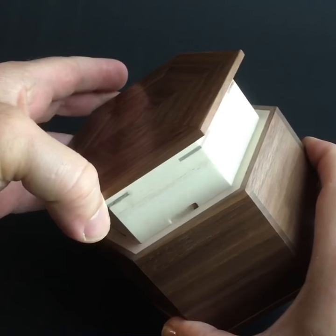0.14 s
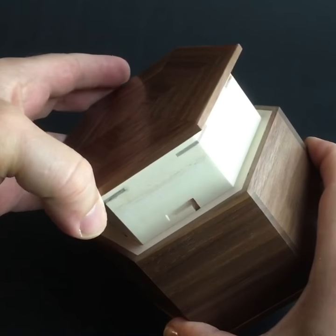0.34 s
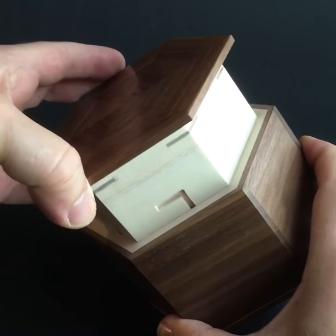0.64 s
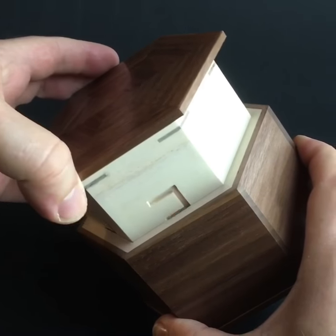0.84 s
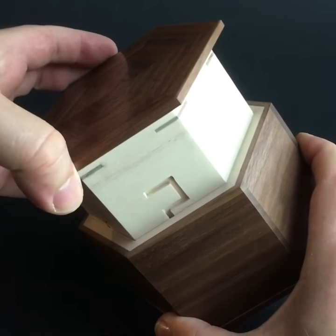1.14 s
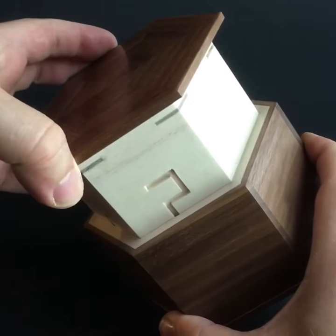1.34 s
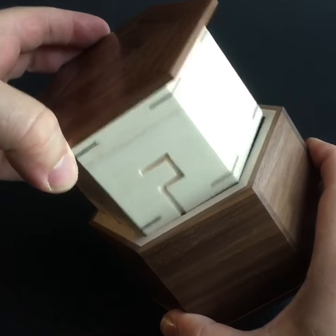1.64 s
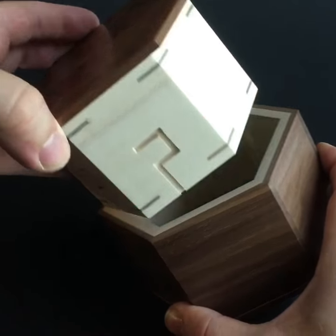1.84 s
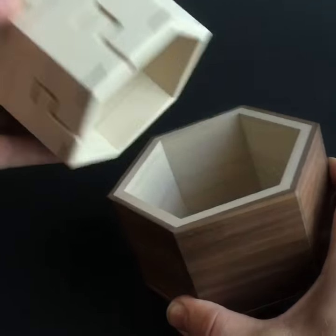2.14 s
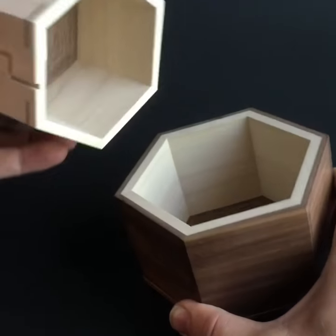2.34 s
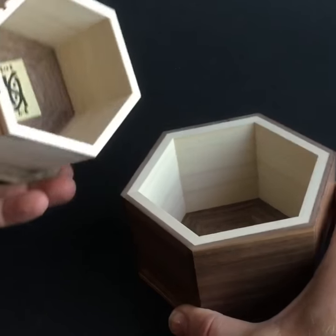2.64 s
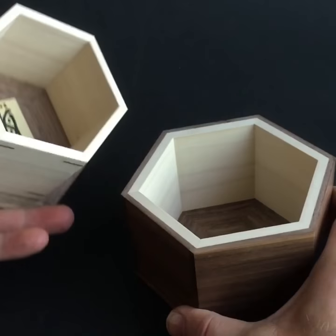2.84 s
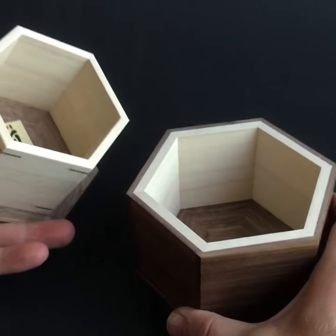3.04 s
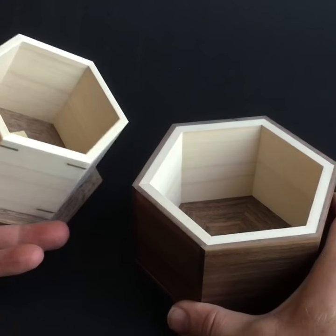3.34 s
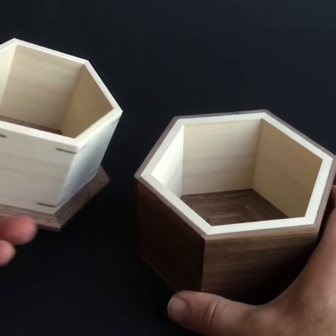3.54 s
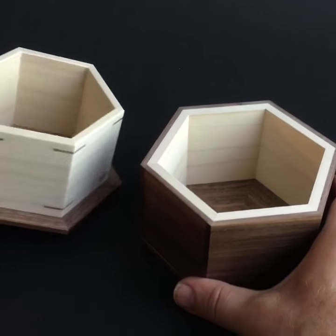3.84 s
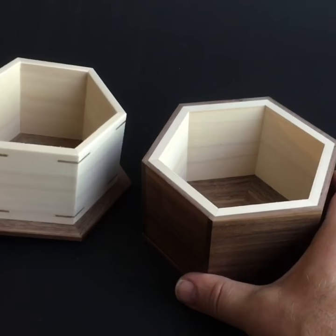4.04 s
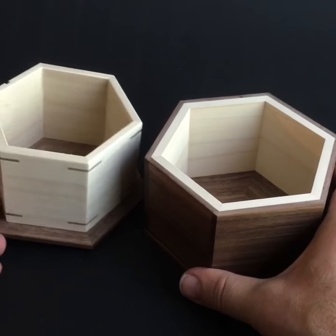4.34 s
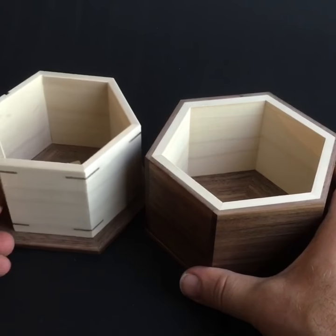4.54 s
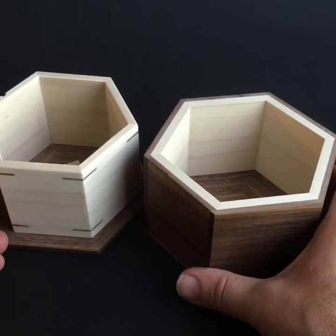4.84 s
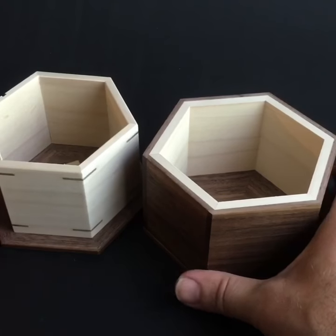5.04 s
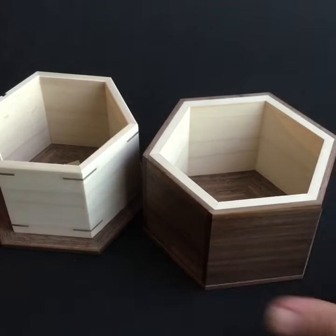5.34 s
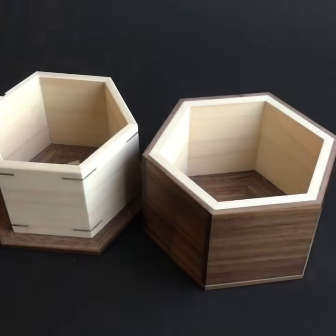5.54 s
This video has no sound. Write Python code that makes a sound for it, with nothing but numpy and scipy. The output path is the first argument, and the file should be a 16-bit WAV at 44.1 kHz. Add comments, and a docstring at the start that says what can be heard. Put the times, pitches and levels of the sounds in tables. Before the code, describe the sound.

Wood slides softly out of a snug wooden shell with a hollow pop, then rubbing, low thuds and one hard knock on a table.

```python
"""A wooden inner box is drawn out of its snug shell, turned in the fingers and set down on a table top.
Slips of wood on wood ring the walls, and the air in the shell pops as the box leaves it.
Half-sine pushes thud the table and knock the box; fine skin slips excite wandering bright peaks.
Fingertips peel off the empty shell at the end, as slips and small taps through its resonances.
Behind lie a murmuring table, a faint wavering whistle, shaped steady noise and sparse room reflections."""
import sys
import numpy as np
from scipy import signal
from scipy.fft import rfft, irfft
from scipy.io import wavfile
from scipy.ndimage import uniform_filter1d

SR = 44100
rng = np.random.default_rng(int(sys.argv[2]) if len(sys.argv) > 2 else 0)


def log_audio(samples):
    """Write samples as a 16-bit WAV file to the path given in sys.argv[1]."""
    # one column per channel
    frames = np.atleast_2d(samples).T
    # limit to full scale, then quantise
    limited = np.clip(frames, -1, 1)
    pcm = np.round(limited * 32767).astype(np.int16)
    wavfile.write(sys.argv[1], SR, pcm)


N = 251370  # length in samples

# Modes of the table top. Each row: pitch in Hz, level in dB, t60 in seconds before damping.
TABLE_MODES = [(72.4, -0.5, 0.2), (105, -1.5, 0.41), (154.8, -6, 0.22), (206, 0, 0.2), (226, 7, 0.13),
               (272.8, 2, 0.2), (305.6, 9, 0.056), (370, -3.5, 0.3), (432.6, -12, 0.28), (469, 0.5, 0.09),
               (531.4, -9, 0.19)]
# Modes of the box body. Each row: pitch in Hz, level in dB, t60 in seconds before damping.
BODY_MODES = [(675, -1, 0.43), (840, -3, 0.16), (1057, -4.5, 0.049), (1327, -1.5, 0.088),
              (1436, -3.5, 0.12), (1610, -6, 0.14), (1896, -5.5, 0.13), (2042, -8, 0.14),
              (2406, -12.5, 0.068)]
# Spectrum of the broad rasp of wood grain. Each row: frequency in Hz, relative level in dB per Hz.
GRAIN_SPECTRUM = [(1210, -37), (2050, -40), (2110, -4.5), (2810, -4), (3130, -8), (4490, -2.5),
                  (5840, -3.5), (6760, -5), (7830, -11), (9200, -4.5), (11800, -39), (15300, -52),
                  (22000, -120)]


def gain_of(db):
    """Amplitude factor of a level in dB."""
    return 10 ** (np.asarray(db) / 20)


def evened(x):
    """Scales a sound to an RMS of 1."""
    return x / np.sqrt(np.mean(x ** 2) + 1e-20)


def peaked(x):
    """Scales a sound to a peak of 1."""
    return x / np.abs(x).max()


def read(points, hz):
    """Value of a table at any frequency, interpolated along log frequency."""
    f, value = np.transpose(points)
    return np.interp(np.log(hz + 1), np.log(f + 1), value)


def over_time(points):
    """A two-column table of seconds and values, read at every sample."""
    return np.interp(np.arange(N) / SR, *np.transpose(points))


def curves(rows):
    """Columns of a table at every sample; the first, a level, is silent outside the table."""
    s, *columns = np.transpose(rows)
    t = np.arange(N) / SR
    level_db, *others = [np.interp(t, s, column) for column in columns]
    inside = (t >= s[0]) * (t <= s[-1])
    return [gain_of(level_db) * inside] + others


def add(mix, s, sound):
    """Lays a sound into the mix from s seconds on."""
    part = mix[round(s * SR):][:len(sound)]
    part += sound[:len(part)]


def colour(x, db_of_hz):
    """Filters a sound by a spectrum given in dB."""
    hz = np.fft.rfftfreq(len(x), 1 / SR)
    return irfft(rfft(x) * gain_of(db_of_hz(hz)), len(x))


def drift(per_s):
    """A random wander: straight lines between normal random knots, per_s of them each second."""
    knots = rng.standard_normal(600)
    return np.interp(np.arange(N) / SR * per_s, np.arange(len(knots)), knots)


def resonate(x, hz, width):
    """Shifts hz (fixed or a curve) down to zero, smooths, and shifts back: a resonance of gain 1."""
    turn = np.exp(2j * np.pi * np.cumsum(hz * np.ones(len(x))) / SR)
    r = np.exp(-np.pi * width / SR)
    smooth = signal.lfilter([1 - r], [1, -r], x / turn + 1e-18)
    return 2 * (turn * smooth).real


def through(x, peaks):
    """Fixed resonances side by side, in alternating phase."""
    out = 0
    for k, (hz, width, db) in enumerate(peaks):
        r = np.exp(-np.pi * width / SR)
        pole = r * np.exp(2j * np.pi * hz / SR)
        out = out + (-1) ** k * gain_of(db) * signal.lfilter([1 - r], [1, -pole], x).real
    return out


def friction(per_s, spread_db, flutter_db, flutter_ms):
    """Dense slips of uneven size whose pressure flutters."""
    happens = rng.random(N) < per_s / SR
    strength = rng.standard_normal(N)
    slips = happens * strength * gain_of(spread_db * np.minimum(rng.exponential(1, N), 4))
    size = max(round(flutter_ms * SR / 1000), 2)
    flutter = evened(uniform_filter1d(uniform_filter1d(rng.standard_normal(N), size), size))
    return evened(slips * gain_of(flutter_db * flutter))


def ring(modes, gains_db, damping=0.96, rise_ms=2.7, size=SR // 2):
    """Impulse response of a set of modes; a few move in opposite phase, and the sound swells briefly."""
    t = np.arange(size) / SR
    hz, db, t60 = np.transpose(modes)[:, :, None]
    sign = np.where(np.arange(len(modes)) % 6 == 2, -1, 1)
    decay = gain_of(db + np.c_[gains_db] - 60 * damping * t / t60)
    swell = 1 - np.exp(-t * 1000 / rise_ms)
    return sign @ (decay * np.sin(2 * np.pi * hz * t)) * swell


def hum():
    """Steady air and microphone noise: white noise given a fixed spectrum."""
    # Each row: frequency in Hz, relative level in dB per Hz.
    spectrum = [(15, -17), (30, 9), (50, 3.5), (121, -11.5), (331, -13.5), (367, -26), (418, -15),
                (527, -28), (665, -23), (1480, -27.5), (2070, -27.5), (2610, -33.5), (3130, -28),
                (12000, -35.5), (15600, -63), (22000, -120)]
    noise = colour(rng.standard_normal(N), lambda hz: read(spectrum, hz))
    return gain_of(-62.5) * evened(noise)


def whistle():
    """A faint near sine that glides, trembles in pitch and flickers."""
    # One table per phrase. Each row: time in seconds, level in dB before the flicker, pitch in Hz.
    phrases = [
        [(0, -84, 2600), (.015, -82, 2500), (.035, -82, 2360), (.06, -95, 2400)],
        [(2.39, -95, 2480), (2.43, -79, 2410), (2.49, -86, 2350), (2.56, -90, 2400), (2.6, -95, 2270),
         (2.625, -82, 2380), (2.66, -88, 2550), (2.72, -81, 2410), (2.755, -84, 2740), (2.79, -86, 2850),
         (2.83, -89, 2690), (2.9, -88, 2790), (2.96, -96, 2620), (3.03, -82, 2570), (3.07, -98, 2600),
         (3.13, -88, 2750), (3.165, -84, 2520), (3.2, -78, 2370), (3.24, -78, 2440), (3.285, -81, 2300),
         (3.31, -96, 2350), (3.33, -77, 2530), (3.37, -80, 2370), (3.42, -87, 2300), (3.45, -98, 2350)],
    ]
    out, tremble = np.zeros(N), 1 + .005 * drift(100)
    for phrase in phrases:
        level, hz = curves(phrase)
        out += np.sqrt(2) * level * np.sin(2 * np.pi * np.cumsum(hz * tremble) / SR)
    return out * gain_of(2 * drift(70))


def shake():
    """Hands and boxes shake the table: soft uneven pushes keep its modes murmuring."""
    # Each row: time in seconds, level in dB, tilt towards the deep modes in dB.
    shaking = [(0.0, -90, -7), (0.11, -56, 0.5), (0.6, -60.5, 3.5), (1.38, -61, -3.5), (1.79, -60, 3.5),
               (2.05, -65, -1.5), (2.75, -67.5, -5), (2.92, -65.5, 6), (3.11, -67.5, -2.5),
               (3.41, -70.5, -12), (3.62, -60, -4.5), (3.9, -53.5, -9.5), (4.24, -57, -1.5),
               (4.44, -55, -12), (4.5, -50, -14), (4.6, -59, 22), (4.7, -73, -2), (4.8, -63, 11),
               (5.06, -63.5, 8), (5.15, -69, -1.5), (5.7, -72, 3.5)]
    level, deep_db = curves(shaking)
    pushes = friction(3000, 1.2, 1.5, 40)

    def murmur(modes):
        response = ring(modes, np.zeros(len(modes)), damping=2.38)
        return evened(signal.oaconvolve(pushes, response)[:N])

    deep, high = murmur(TABLE_MODES[:3]), murmur(TABLE_MODES[3:])
    return level * (gain_of(deep_db / 2) * deep + gain_of(-deep_db / 2 - 3.5) * high)


def slide():
    """Slips of wood drawn along wood ring the walls; the lower modes gain as the shell empties."""
    # Each row: time in seconds, level in dB and rasp against the walls in dB, both before the mix trims.
    drawing = [(0.045, -85, 11), (0.056, -66, -5), (0.095, -73, -3), (0.115, -64, 1.5), (0.2, -61, -3.5),
               (0.35, -65.5, 0.5), (0.39, -66, -2.5), (0.81, -64.5, -6), (0.886, -60, -5.5),
               (1.02, -65, -4.5), (1.19, -65.5, -4), (1.23, -62, -4), (1.29, -67.5, -3), (1.35, -61.5, -3),
               (1.386, -58, -2.5), (1.46, -65, -3.5), (1.5, -57.5, -4.5), (1.63, -56, -8.5),
               (1.71, -57.5, 2.5), (1.73, -73, -25), (1.78, -90, -3)]
    # Wall resonances, first three hollow, rest closed. Each row: pitch in Hz, width in Hz, level in dB.
    wall_modes = [(1143, 84, -5.5), (1240, 150, 1.5), (1423, 200, -4.5), (1565, 30, 0), (1830, 210, -1.5),
                  (1923, 51, 4.5), (716, 1260, -11.5)]
    # The shell empties. Each row: time in seconds, hollowness from 0 to 1.
    emptying = [(1.25, 0.42), (1.45, 0.57), (1.58, 0.73), (1.7, 0.67)]
    # Air gap between the walls. Each row: time in seconds, pitch in Hz.
    air_gap = [(.1, 5600), (.5, 5180), (.95, 5160), (1.3, 4830), (1.42, 4800), (1.48, 4250), (1.719, 4250)]
    # Each row: centre in Hz, width in Hz, mean level above the rasp in dB.
    rasp_peaks = [(3680, 710, -11), (4250, 42, -18.5), (6710, 98, -12.5), (7240, 70, -14)]

    level, rasp_db = curves(drawing)
    hollow = np.clip(over_time(emptying), 0, 1)
    slips = friction(6000, 0.22, 1.0, 26)
    # the shifting contact favours now one mode, now another
    modes = [gain_of(1.26 * drift(11.85)) * through(slips, [mode]) for mode in wall_modes]
    open_walls = evened(modes[0] - modes[1] + modes[2])
    closed_walls = evened(modes[3] - modes[4] + sum(modes[5:]))
    walls = hollow * open_walls + (1 - hollow) * closed_walls

    grit = friction(3500, 0.3, 0.46, 52)
    rasp = evened(colour(grit, lambda hz: read(GRAIN_SPECTRUM, hz)))
    for hz, width, db in rasp_peaks:  # each swells and wanders as the contact shifts
        swell = gain_of(db + 2 * drift(6.8))
        rasp = rasp + swell * evened(resonate(grit, hz * (1 + 0.02 * drift(6.8)), width))

    slit_hz = over_time(air_gap)
    slit = evened(resonate(grit, slit_hz, 170))
    # the air under the box deepens
    under_air = evened(resonate(slips, 0.296 * slit_hz, 200))
    walls = walls + gain_of(-12) * hollow * under_air
    scrape = rasp + gain_of(-9.5 + 2 * drift(10.0)) * slit
    return level * (gain_of(2.0) * walls + gain_of(rasp_db - 1.0) * scrape)


def ticks():
    """Hard edges of wood meet: brief bright bursts of crackle."""
    # Each row: start in seconds, level in dB before the envelope, brightness in dB per octave.
    edges = [(0.054, -60, -12), (1.7, -30, -19), (1.951, -46.5, -7.5), (2.02, -54, -11), (2.47, -52, 2),
             (3.341, -44, -5.5), (3.69, -31.5, -3.5), (3.693, -34, -3.5), (3.745, -33.5, -7),
             (4.297, -43, -2), (4.197, -55, 8), (4.444, -23.5, 1), (4.45, -14.5, 5), (4.463, -21, -7),
             (4.475, -30.5, 10), (4.497, -34, -4), (4.535, -37.5, 7), (4.642, -31.5, -13), (5.102, -54, -5),
             (5.285, -60, -3), (5.381, -57, -11), (5.458, -53, -19)]
    # Each row: frequency in Hz, relative level in dB per Hz.
    spectrum = [(530, -13.5), (900, -2.5), (2020, -7.5), (2590, -9), (3890, -7), (4530, -3), (5090, -13),
                (6530, -9), (8540, -16), (10700, -33), (11800, -41), (15300, -70), (22000, -120)]
    out, t = np.zeros(N), np.arange(2048) / SR
    envelope = np.minimum(t / 0.00039, 1) * np.exp(-t * 1000 / 2.56)  # fades with a 2.56 ms time constant
    for s, db, tilt_db in edges:
        grit = rng.standard_normal(2048)
        burst = colour(grit, lambda hz: read(spectrum, hz) + tilt_db * np.log2((hz + 300) / 5000))
        add(out, s, gain_of(db) * evened(burst) * .5 * envelope)
    return out


def blows():
    """A half-sine push rings the table and the box; each spot favours the modes near its own pitch."""
    # Touches. Each row: start in seconds, thud peak in dB, pitch favoured by the spot in Hz,
    # fall of the modes away from it in dB per octave, extra in the two deepest modes in dB,
    # knock above the thud in dB.
    touches = [(0.058, -45.5, 105, 10.5, 1.5, -32), (0.104, -47.5, 149, 32, -4, -32),
               (0.36, -48, 105, 17, 9, -28), (1.576, -49.5, 115, 3, 8, -28), (1.952, -47, 125, 2, -3, -32),
               (2.861, -51, 101, 11, 3.5, -16), (2.921, -53, 206, 12, -11, -28),
               (3.231, -40.5, 152, 12, -8, -13.5), (3.243, -44.5, 140, 12, -1, -20),
               (3.342, -33.5, 270, -0.5, 2, -14), (3.359, -41, 120, 3, -9, -12),
               (3.496, -43, 99, 2, 1.5, -10), (3.504, -35, 307, 13, -10, -24),
               (3.521, -36.5, 352, 15, 1, -18), (3.696, -37, 232, 14, 5, -5), (3.748, -26, 226, 12, 2, -22),
               (3.771, -34, 260, 24, -7, -29), (3.88, -39, 215, -1, -11, -24),
               (3.897, -33.5, 227, 7.5, -2, -16), (3.936, -47.5, 217, 14, -4, -9),
               (3.98, -40.5, 229, 4, 9, -30), (4.196, -39, 307, 5, 5, -31), (4.221, -37, 302, 30, 1, -19),
               (4.234, -38, 300, 7, -1, -10), (4.257, -39, 305, 8, 6, -18),
               (4.297, -41.5, 266, 20, -7, -11), (4.444, -21.5, 186, 8, 8.5, -27),
               (4.4508, -12.5, 232, 6, 7.5, -10.5), (4.475, -27, 162, -2, 14, -4.5),
               (4.496, -27.5, 96, 1.5, 9, -16), (4.534, -53, 108, -6, -12, -17),
               (4.643, -36.5, 305, -3.5, -4, -18), (4.892, -46, 370, 7.5, 8, -10),
               (4.921, -62, 100, 15, -3, -29), (5.083, -52, 330, 8, -4, -33), (5.1, -51, 80, 10, 0, -22)]
    # How hard the hands press and choke the table. Each row: time in seconds, damping factor.
    hand_press = [(0, 1.5), (3.2, 2.14), (3.5, 2.4), (3.75, 1.22), (4.2, 1.2), (4.45, 1.26), (4.64, 1.13),
                  (4.9, 1.6), (5.1, 2.2)]
    contact_cycles = 0.22  # a touch lasts this share of a cycle of the spot's pitch
    out = np.zeros(N)
    table_hz = np.array(TABLE_MODES)[:, 0]
    deepest = np.arange(len(TABLE_MODES)) < 2
    for s, db, spot_hz, focus_db, deep_db, knock_db in touches:
        push = np.sin(np.linspace(0, np.pi, max(round(contact_cycles * SR / spot_hz), 4)))
        # every touch also scatters the mode levels at random
        table_spot = rng.standard_normal(len(TABLE_MODES))
        body_spot = rng.standard_normal(len(BODY_MODES))
        near_db = -focus_db * abs(np.log2(table_hz / spot_hz)) + deep_db * deepest
        damping = max(np.interp(s, *np.transpose(hand_press)), .5)
        table = ring(TABLE_MODES, table_spot + near_db, damping, rise_ms=1.48)
        thud = signal.oaconvolve(table, push)
        add(out, s, -gain_of(db) * peaked(thud))

        free = ring(BODY_MODES, body_spot, rise_ms=0.54, size=SR // 4)
        # the hand chokes most of the ring
        held = ring(BODY_MODES, body_spot, damping=3.6, rise_ms=0.023, size=SR // 4)
        # the edge lands quicker than the weight
        knock = signal.oaconvolve(held + gain_of(-23.5) * free, push[::8])
        add(out, s, gain_of(db + knock_db) * peaked(knock))
    return out


def room(x):
    """Sparse reflections of random sign, each band dying at its own speed."""
    # Each row: frequency in Hz, t60 in seconds.
    decay_times = [(100, 0.31), (500, 0.34), (1500, 0.42), (3000, 0.39), (6000, 0.28), (11000, 0.047)]
    taps = np.zeros(SR)
    at = np.arange(300, SR - 20, 20)
    taps[at + rng.integers(0, 20, len(at))] = rng.choice([-1., 1.], len(at))
    hz, t, z = signal.stft(taps, SR, nperseg=256)
    fade = gain_of(-60 * t / read(decay_times, hz)[:, None])
    tail = signal.istft(z * fade, SR, nperseg=256)[1]
    return signal.fftconvolve(x, tail / np.linalg.norm(tail))[:N]


def pop():
    """The air in the shell sounds two decaying notes as the box leaves it."""
    # One row: level in dB, pitch in Hz, t60 in seconds before damping.
    shell_air = (-37.5, 460, 0.051)
    db, hz, t60 = shell_air
    out = np.zeros(N)
    add(out, 1.704, -gain_of(db) * ring([(hz, 0, t60), (0.56 * hz, -5, t60)], [0, 0]))
    return out


def strokes():
    """Gains of the bright rub and of the mid band: each stroke swells, holds and fades."""
    # Each row: time at full level in seconds, level in dB, hold in seconds, fade in dB per second,
    # mid band above the level in dB.
    rubs = [(1.884, -70, 0.027, 141, -6.5), (1.968, -71.5, 0.026, 100, 1.5), (2.023, -61.5, 0.044, 150, -9),
            (2.076, -57, 0.027, 116, -15), (2.14, -60, 0.056, 120, -13.5), (2.196, -60, 0.044, 450, -13),
            (2.307, -61.5, 0.021, 352, -14), (2.372, -62, 0.049, 300, -9), (2.471, -62, 0.011, 252, -9),
            (2.491, -64.5, 0.021, 187, -6), (2.628, -66.5, 0.087, 98, -13.5), (2.716, -64, 0.017, 150, -8),
            (2.805, -68.5, 0.013, 198, -6), (2.899, -71.5, 0.016, 168, -4.5), (3.033, -68.5, 0.01, 250, -5),
            (3.138, -72.5, .012, 242, 0), (3.305, -70.5, 0.11, 111, 1), (3.37, -66, 0.099, 100, -3.5),
            (3.492, -52.5, 0.01, 87, -7.5), (3.583, -61.5, 0.063, 168, -5.5), (3.697, -58.5, 0.081, 292, 2),
            (3.853, -57, 0.037, 271, -0.5), (3.964, -61.5, 0.024, 125, -0.5), (4.018, -64, 0.018, 200, -3),
            (4.127, -64.5, 0.0096, 245, -0.5), (4.214, -56.5, 0.0095, 96, 0), (4.34, -64, 0.037, 100, -2),
            (4.411, -57.5, 0.022, 104, -6.5), (4.437, -49, .004, 300, -11.5),
            (4.492, -58.5, 0.0044, 235, 9.5), (4.553, -70, 0.0078, 84, 10.5),
            (5.445, -71.5, 0.0097, 254, -3)]
    rise_db_per_s = 501
    t, bright, mid = np.arange(N) / SR, np.zeros(N), np.zeros(N)
    for s, db, hold, fade_db, mid_db in rubs:
        rise = rise_db_per_s * np.maximum(s - t, 0)
        fade = fade_db * np.maximum(t - s - hold, 0)
        gain = gain_of(db - rise - fade)
        bright = np.maximum(bright, gain)
        mid = np.maximum(mid, gain * gain_of(mid_db))
    return bright, mid


def brush():
    """Fine skin slips on polished wood: bright peaks wander with the grip, the box body underneath."""
    # Each row: centre in Hz before the shifts, width in Hz, level in dB before tilt and wander.
    bright_peaks = [(3640, 260, 0.5), (4120, 120, 2), (4555, 150, 4.5), (4900, 140, -23), (5180, 120, -1),
                    (5760, 190, 3.5), (6480, 240, 0.5), (7040, 370, -6), (8060, 1250, -9.5),
                    (8880, 780, -11.5), (11070, 460, -24.5)]
    # The turning box moves its bright peaks. Each row: time in seconds, shift in octaves,
    # brightness in dB per octave.
    turning = [(1.9, -0.067, -5), (2.06, -.07, 3.5), (2.16, 0.011, -1.5), (2.22, 0.031, -7),
               (2.3, -0.014, 1), (2.4, 0.053, 0), (2.5, .01, -1.5), (2.9, -0.018, 4.5), (3.3, -0.00069, 1),
               (3.5, 0.046, 5), (3.7, -0.00097, 3), (3.9, -0.0012, 0), (4.2, -0.011, -3.5),
               (4.4, -0.041, 0)]
    level, mid = strokes()
    s, *controls = np.transpose(turning)
    shift, tilt_db = (np.interp(np.arange(N) / SR, s, control) for control in controls)
    slips = friction(4000, 1.2, 2.85, 31)
    bright = 0
    for k, (hz, width, db) in enumerate(bright_peaks):
        gain = gain_of(db + tilt_db * np.log2(hz / 5500) + 2.5 * drift(18.0))
        peak_hz = hz * 2 ** shift * (1 + 0.019 * drift(8.3))
        delayed = np.roll(slips, k * SR // 100)  # 10 ms more for every peak
        bright = bright + gain * resonate(delayed, peak_hz, width)
    body_peaks = [(hz, 20. / t60, db) for hz, db, t60 in BODY_MODES]
    body = evened(through(friction(4000, 0.54, 0.45, 24.0), body_peaks))
    broad = evened(colour(slips, lambda hz: read(GRAIN_SPECTRUM, hz) + 4.9 * np.log2((hz + 300) / 5500)))
    rub = evened(gain_of(-0.5) * evened(bright) + gain_of(-7.5) * broad)
    return level * rub + mid * body


def peel():
    """Fingertips peel off: sticky soft slips scrape the empty shell, and small taps ring it."""
    # Each row: time in seconds, level in dB before a 12 dB cut.
    scrape_levels = [(5.376, -92), (5.381, -59), (5.398, -62), (5.43, -56), (5.458, -50), (5.48, -72),
                     (5.54, -76), (5.56, -90)]
    # Each row: start in seconds, wall note peak in dB, hollow note above it in dB.
    taps = [(5.381, -60.5, -20), (5.424, -63, -13), (5.435, -56, -7.5), (5.443, -60, -15),
            (5.454, -68, -15), (5.459, -47, -5)]
    # Shell resonances, the hollow note first. Each row: pitch in Hz, width in Hz, level in dB.
    shell = [(346, 46, 0), (1910, 30, 6.5), (2130, 150, 10), (2510, 500, 2.5), (3540, 79, -2.5)]
    # a fingertip is too soft for the treble
    slips = resonate(resonate(friction(2000, 1.3, 3.4, 8.7), 1700, 1300), 2600, 1300)
    out = curves(scrape_levels)[0] * gain_of(-12) * evened(through(slips, shell[1:]))
    hollow, *walls = [(hz, db, 2.2 / width) for hz, width, db in shell]
    tap = peaked(ring(walls, np.zeros(len(walls)), rise_ms=0.22))
    boom = peaked(ring([hollow], [0]))
    for s, db, hollow_db in taps:
        add(out, s, gain_of(db) * (tap + gain_of(hollow_db) * boom))
    return out


def scene():
    """Sums the direct sounds, the room's answer to thuds and wood, and the background."""
    thuds = blows()
    bright = ticks() + slide() + pop() + brush() + peel()
    echoes = room(gain_of(-10.5) * thuds + gain_of(-14.5) * bright)
    return (thuds + bright + shake() + echoes + whistle() + hum())[None]


def record(dry):
    """The microphone drops the deepest bass; then a low-pass limits the band."""
    edge_hz = 11950
    thin = signal.sosfilt(signal.butter(4, 55, "high", fs=SR, output="sos"), dry)
    low_pass = signal.firwin(511, edge_hz, window=("kaiser", 9), fs=SR)
    return signal.oaconvolve(thin, low_pass[None], "same")


dry = scene()
out = record(dry)
log_audio(out)
```